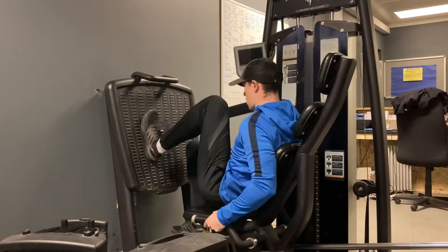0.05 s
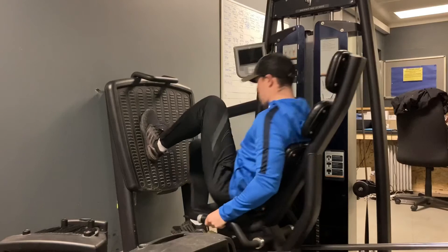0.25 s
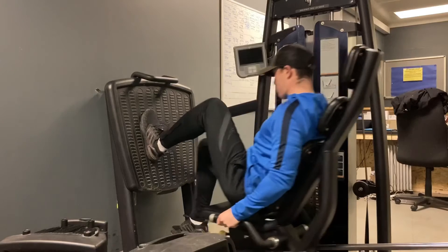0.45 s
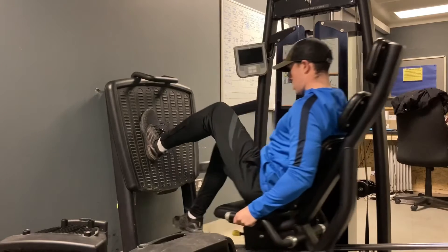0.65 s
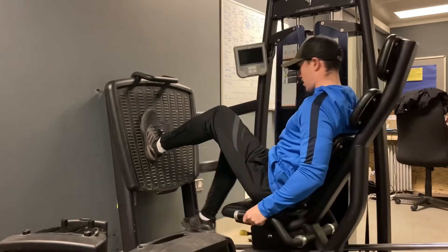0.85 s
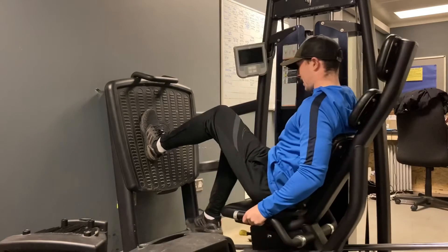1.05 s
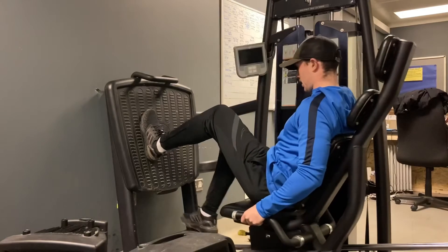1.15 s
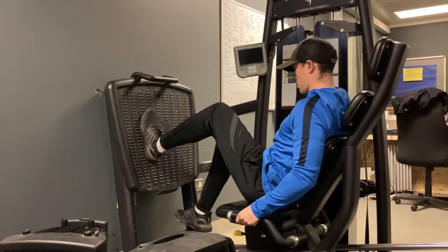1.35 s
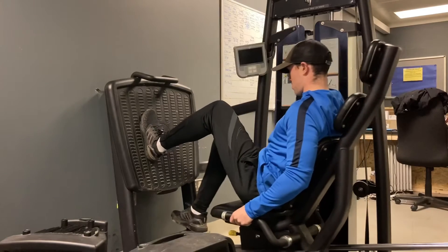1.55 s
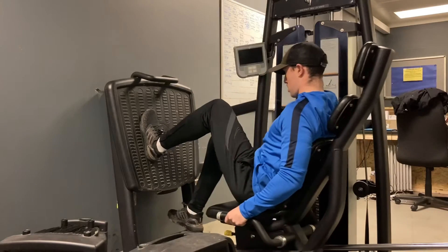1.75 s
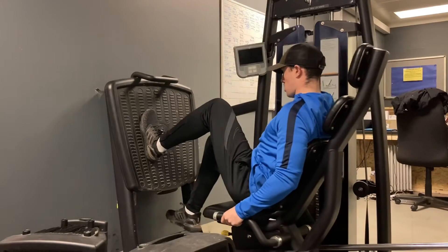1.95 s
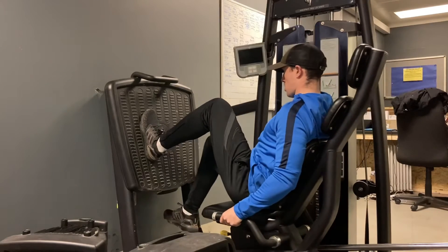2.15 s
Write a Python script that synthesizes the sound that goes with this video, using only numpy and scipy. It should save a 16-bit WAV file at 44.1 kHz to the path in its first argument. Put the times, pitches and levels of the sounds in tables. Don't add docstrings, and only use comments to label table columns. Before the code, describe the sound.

A leg press carriage moves in a quiet, ventilated room. A latch clacks at 0.1 s, a steel pin clanks and rings at 0.2, then padded jolts judder until about 0.45, strongest near 0.25 to 0.3. Rollers rumble and the seat rattles; belt scrape, a tiny squeak and nylon swish come around 0.45 to 0.75. From 1 s, only soft rolling, faint cloth and tiny ticks near 1.8 remain.

```python
import sys
import numpy as np
from scipy import signal
from scipy.fft import rfft, irfft, next_fast_len
from scipy.io import wavfile
from scipy.ndimage import uniform_filter1d, map_coordinates

SR = 44100
rng = np.random.default_rng(int(sys.argv[2]) if len(sys.argv) > 2 else 0)


def master(y):
    cut = np.clip(np.atleast_2d(y).T, -1, 1)
    pcm = np.round(cut * 32767)
    wavfile.write(sys.argv[1], SR, pcm.astype(np.int16))


def volts_from_decibels(level):
    exponent = np.asarray(level, float) / 20
    return 10 ** exponent


N = 97020

# (frequency [Hz], level [dB per Hz])
AIR_COLOUR = [(30, -5), (150, -6.5), (900, -9), (1500, -9.5), (3000, -17.5), (5000, -22.5), (8300, -29),
              (12000, -50.5), (14000, -58)]
# (frequency [Hz], width [Hz], level [dB])
DUCT_PEAKS = [(530, 60, -4), (850, 50, -2), (925, 50, 0)]
# (frequency [Hz], time to fall 60 dB [s])
ROOM_DECAY = [(150, 1), (1000, 1), (4000, 0.28), (12000, 0.053)]
# (time [s], level [dB])
SWISH_LEVEL = [(0.0, -79), (0.14, -77), (0.27, -65), (0.34, -56), (0.46, -52.5), (0.58, -53.5),
               (0.66, -54.5), (0.82, -65.5), (0.91, -83), (1.21, -74), (1.41, -64), (1.53, -65),
               (1.85, -68.5), (1.91, -75), (2.05, -83), (2.2, -84)]
# (frequency [Hz], level [dB per Hz])
CLOTH_COLOUR = [(1500, -19), (3000, -5), (5500, -6.5), (7500, -5.5), (9500, 1.5), (11500, -3.5),
                (14000, -6.5), (16500, -7)]
# (time [s], peak level [dB])
FITTING_TICKS = [(0.0922, -44.5), (.1875, -44), (0.196, -38), (.208, -47.5), (1.769, -53.5), (1.832, -58),
                 (1.8502, -60), (1.942, -51)]
# (frequency [Hz], level [dB per Hz])
TICK_COLOUR = [(3000, 4), (5000, 15), (7000, 1.5), (9000, 21.5), (11500, 13), (14000, 16.5), (15500, 9),
               (16500, -1)]
# (time [s], level [dB], rise [s], time to fall 60 dB [s])
BELT_RUBS = [(.44, -42, .03, 0.23), (0.524, -33, 0.02, 0.33), (.595, -36.5, 0.0085, 0.13),
             (.655, -36, 0.036, 0.3), (.69, -34, 0.019, 0.29), (.76, -56.5, 0.011, 0.29)]
# (frequency [Hz], level [dB per Hz])
BELT_COLOUR = [(300, -16), (600, -1.5), (1300, 1), (2300, 0.5), (3500, -12.5), (7000, -19), (10000, -93)]
# (frequency [Hz], level [dB], time to fall 60 dB [s])
PULLEY_TONES = [(1270, 3, .16), (1480, -4, .1)]
# (time [s], level [dB], rise [s], time to fall 60 dB [s])
PIN_CHATTER = [(.196, -37, .01, .25), (.297, -42, .004, .08), (.318, -39, .008, .12),
               (.379, -41, .008, .16), (.47, -50, .02, .5)]
# (frequency [Hz], width [Hz], level [dB])
BORE_PEAKS = [(3560, 130, 0)]
# (frequency [Hz], level [dB], time to fall 60 dB [s])
LATCH_TONES = [(188, 3, .2), (834, 0, .12), (860, -4, .1), (1130, -3, .08), (1470, 1, .08), (2000, -3, .07),
               (2336, -4, .07), (2595, -6, .07), (2923, -8, .08), (3800, 5, .045)]
# (frequency [Hz], level [dB per Hz])
SNAP_COLOUR = [(200, -12), (400, -10), (900, -23), (2000, 4.5), (3800, -3.5), (6000, -3.5), (16000, -29)]
# (time [s], level [dB])
PIN_BLOWS = [(.196, -15)]
# (frequency [Hz], level [dB], time to fall 60 dB [s])
PIN_TONES = [(3079, -18, .08), (3545, -14, .08), (3574, -12, .2), (3580, 0, .13), (3625, -14, .08)]
# (frequency [Hz], level [dB], time to fall 60 dB [s])
PLATE_TONES = [(618, -1, .1), (737, -1, .16), (877, -6, .14), (1031, -5, .14), (1415, 2, .07),
               (1600, -9, .08), (1685, -8, .12), (1890, -8, .2), (1965, -10, .2), (2156, -8, .06),
               (2270, -12, .12), (3074, -12, .1), (3950, -14, .08), (4450, -14, .04)]
# (time [s], level [dB], rise [s], time to fall 60 dB [s])
METAL_CLANKS = [
    (0.183, -17.5, 0.03, 0.3),
    (.205, -29, 0.028, 0.33),
]
# (frequency [Hz], level [dB per Hz])
CLATTER_COLOUR = [(300, -12), (700, -2), (1500, -2), (2500, -1.5), (4500, -5.5), (7000, -16.5), (10000, -7),
                  (16000, -71)]
# (time [s], peak level [dB], pitch [Hz], time to fall 60 dB [s])
JOLTS = [(0.203, -15.5, 312, 0.03), (0.21, -20.5, 614, .04), (0.223, -15, 418, 0.052),
         (0.243, -3, 455.5, 0.0204), (0.256, -17.5, 354.6, 0.038), (.278, -18, 454, 0.019),
         (0.3, -7, 303, 0.034), (0.313, -9, 292.5, 0.051), (0.341, -11.5, 327, 0.026),
         (0.373, -10, 338.8, 0.048), (0.417, -14.5, 354, 0.032), (.435, -14, 320, .03),
         (0.545, -21, 217, 0.065), (0.637, -41, 182, 0.025), (0.743, -29, 222, 0.048)]
# (frequency [Hz], width [Hz], level [dB])
SEAT_PEAKS = [(231.5, 48, -5.5), (330.5, 24.4, 0), (352, 22.7, 0.5), (433, 47, -1), (536.8, 53, -2),
              (770, 185, -7), (863, 40, -0.5), (990.5, 40, -2.5), (1400, 600, -21), (1936, 150, -12),
              (2320, 600, -18)]
# (frequency [Hz], level [dB per Hz])
RATTLE_COLOUR = [(100, -69), (250, 3.5), (700, -1), (2000, -17), (5000, -16.5), (9000, -47), (11000, -90)]
# (time [s], level [dB])
ROLL_SPEED = [(0.0, -39.5), (0.08, -49), (0.1, -35.5), (0.18, -36.5), (0.24, -29), (0.28, -23.5),
              (0.31, -23), (0.35, -23.5), (0.44, -25.5), (0.46, -26), (0.57, -28), (0.63, -29.5),
              (0.78, -32.5), (1.05, -45), (1.59, -44), (1.88, -47.5), (1.96, -56), (2.2, -62)]
# (frequency [Hz], level [dB per Hz])
RUMBLE_COLOUR = [(25, 8), (45, 0.5), (100, -6), (300, -5.5), (600, 4), (2000, 0), (7000, -34), (10000, -90)]
# (frequency [Hz], width [Hz], level [dB])
FRAME_PEAKS = [(48, 20, -10), (72, 25, -5), (150, 24, -2), (192, 22, 0), (235, 30, -8)]
# (frequency [Hz], width [Hz], level [dB])
ROLLER_PEAKS = [(156.5, 10, -3), (199.3, 7.2, -2.5), (230, 14, -2)]
# (frequency [Hz], likeness [0 to 1])
LIKENESS = [(60, .97), (290, .82), (640, .5), (1400, .4), (3500, .3), (5600, .25), (6600, .96),
            (16000, .97)]
# (frequency [Hz], left lag [radians])
PORT_LAG = [(0, 0), (1500, 1.2), (6500, 12.4), (7500, 12.75), (8500, 15.5), (9600, 15.9), (10900, 18.6),
            (12000, 19.1), (13100, 21.8), (14400, 22.2), (15200, 25), (16000, 25.2)]
# (frequency [Hz], left over right [dB])
BALANCE = [(60, -2), (200, -1), (500, 0), (1500, 1), (6000, 1), (10000, 0)]


def unit(x):
    return x / np.sqrt(np.mean(x ** 2) + 1e-20)


def along(points, hz):
    f, v = np.transpose(points)
    return np.interp(np.log(hz + 1), np.log(f + 1), v)


def curve(rows):
    return np.interp(np.arange(N) / SR, *np.transpose(rows))


def wobble(rate):
    knots = rng.standard_normal(int(N * rate / SR) + 4)
    return map_coordinates(knots, [np.arange(N) * rate / SR])


def filtered(x, response):
    m = next_fast_len(N + SR // 2)
    return irfft(rfft(x, m) * response(np.fft.rfftfreq(m, 1 / SR)), m)[..., :N]


def spread(pair, spectrum):
    def shares(hz):
        turn = np.arccos(np.clip(along(LIKENESS, hz), -1, 1)) / 2
        return volts_from_decibels(along(spectrum, hz)) * [np.cos(turn), np.sin(turn)]

    mid, side = filtered(pair, shares)
    return np.array([mid + side, mid - side])


def rush(spectrum, patchy_db):
    z = signal.stft(rng.standard_normal((2, N)), nperseg=512)[2]
    field = uniform_filter1d(rng.standard_normal(z.shape[1:]), 6, 0)
    field = uniform_filter1d(field, 10, 1)
    noise = signal.istft(z * volts_from_decibels(patchy_db * unit(field)), nperseg=512)[1][:, :N]
    return unit(spread(noise, spectrum))


def after(s, rise_s, t60):
    t = np.maximum(np.arange(N) / SR - s, 0)
    return (1 - np.exp(-t / rise_s)) * volts_from_decibels(-60 * t / t60)


def bursts(rows):
    return sum(volts_from_decibels(db) * after(s, rise_s, t60) for s, db, rise_s, t60 in rows)


def ring(s, db, modes, rise_s):
    start, out = int(s * SR) + 1, np.zeros(N + SR)
    t = (start + np.arange(int(0.6 * SR))) / SR - s
    tones = sum(volts_from_decibels(db + level - 60 * t / t60) * np.sin(2 * np.pi * hz * t) for hz, level, t60 in modes)
    out[start:start + len(t)] = (1 - np.exp(-t / rise_s)) * tones
    return out[:N]


def body(peaks, leak):
    def response(f):
        total = leak
        for k, (centre, width, db) in enumerate(peaks):
            band = 1j * f * width / (centre * centre - f * f + 1j * f * width)
            total = total + (-1) ** k * volts_from_decibels(db) * band
        return total

    return response


def plate(modes):
    return body([(hz, 60, db) for hz, db, t60 in modes], leak=0.3)


def ventilation():
    return volts_from_decibels(-53) * filtered(rush(AIR_COLOUR, patchy_db=1.4), lambda hz: 1 + abs(body(DUCT_PEAKS, leak=0)(hz)))


def room(x):
    hz, t, z = signal.stft(rng.standard_normal((2, SR // 2)), SR, nperseg=256)
    fade = volts_from_decibels(-60 * t / along(ROOM_DECAY, hz)[:, None])
    tail = signal.istft(z * fade, SR, nperseg=256)[1]
    delayed = np.pad(x, (300, 0))[None]
    wet = signal.fftconvolve(delayed, tail / np.linalg.norm(tail[0]), axes=1)[:, :N]
    return spread(wet, [(100, 0.0059)])


def jacket():
    level_db = curve(SWISH_LEVEL) + 3 + 1.5 * wobble(400) + 1.2 * wobble(20)
    return volts_from_decibels(level_db) * rush(CLOTH_COLOUR, patchy_db=1.5)


def ticks():
    shape = 0
    for s, db in FITTING_TICKS:
        click, answer = after(s, 0.00052, 0.067), volts_from_decibels(-9) * after(s, 0.0013, 0.44)
        shape = shape + volts_from_decibels(db + 4.5) * (click + answer)
    return shape * rush(TICK_COLOUR, patchy_db=0.6)


def belt():
    scrape = unit(filtered(rush(BELT_COLOUR, patchy_db=1.8), plate(PLATE_TONES)))
    return bursts(BELT_RUBS) * volts_from_decibels(0.89 * wobble(119.4)) * scrape


def pulley():
    return ring(0.535, -31, PULLEY_TONES, rise_s=0.011)


def pin_buzz():
    bore = body(BORE_PEAKS, leak=0)
    whine = unit(filtered(rng.standard_normal(N), lambda hz: bore(hz) ** 2))
    return bursts(PIN_CHATTER) * volts_from_decibels(0.81 * wobble(42.3)) * whine


def latch_rattle():
    snap_s = 0.089
    shape = after(snap_s, 0.008, 0.06) + volts_from_decibels(-13.5) * after(snap_s, 0.012, 0.5)
    return volts_from_decibels(-23.5) * shape * unit(filtered(rush(SNAP_COLOUR, patchy_db=2.0), plate(LATCH_TONES)))


def latch_ring():
    return ring(0.09298, -35, LATCH_TONES, rise_s=0.0062)


def pin_and_plate():
    pin = sum(ring(s, db, PIN_TONES, rise_s=0.011) for s, db in PIN_BLOWS)
    return pin + ring(0.207, -20, PLATE_TONES, rise_s=0.0096)


def clatter():
    parts = unit(filtered(rush(CLATTER_COLOUR, patchy_db=-0.5), plate(PLATE_TONES)))
    return bursts(METAL_CLANKS) * volts_from_decibels(2.8 * wobble(160.0)) * parts


def jolted_seat():
    shape = bursts([(s, db - 11, 0.003, 0.089) for s, db, hz, t60 in JOLTS])
    return shape * unit(filtered(rush(RATTLE_COLOUR, patchy_db=3.5), body(SEAT_PEAKS, leak=0.11)))


def judder():
    out = 0
    for s, db, hz, t60 in JOLTS:
        modes = [(hz, 0, t60), (hz * 0.7, -3, t60 * 0.99), (hz * 1.558, -10, t60 * 0.91)]
        out = out + ring(s, db + 10, modes, rise_s=0.012)
    return out


def carriage():
    speed_db = curve(ROLL_SPEED)
    top_db = speed_db.max()
    rumble = volts_from_decibels(0.33 * wobble(25.1)) * rush(RUMBLE_COLOUR, patchy_db=1.5)
    rumble = unit(filtered(rumble, body(FRAME_PEAKS, leak=0.027)))
    rattle = volts_from_decibels(0.39 * wobble(92.0)) * rush(RATTLE_COLOUR, patchy_db=1.0)
    rattle = unit(filtered(rattle, body(SEAT_PEAKS, leak=0.12)))
    rollers = body(ROLLER_PEAKS, leak=0)
    whirr = unit(filtered(rush([(100, 0)], patchy_db=-1.0), lambda hz: rollers(hz) ** 2))
    rattle_db = top_db - 1 + 1.5 * (speed_db - top_db)
    return volts_from_decibels(speed_db - 7.5) * (rumble + volts_from_decibels(-4) * whirr) + volts_from_decibels(rattle_db) * rattle


def scene():
    struck = judder() + pin_and_plate() + latch_ring() + pulley() + pin_buzz()
    background = ventilation() + jacket() + ticks()
    machine = carriage() + clatter() + latch_rattle() + jolted_seat() + belt()
    return struck + volts_from_decibels(-12) * room(struck) + machine + background


def top_cut(x):
    return signal.sosfilt(signal.butter(12, 16630, fs=SR, output="sos"), x)


def record(dry):
    def ports(hz):
        lag = np.exp(np.outer([-0.5j, 0.5j], np.interp(hz, *np.transpose(PORT_LAG))))
        band = (hz < 16000) / (1 + (38 / (hz + 1)) ** 6)
        return lag * band * volts_from_decibels(np.outer([0.5, -0.5], along(BALANCE, hz)))

    return top_cut(filtered(dry, ports))


dry = scene()
out = record(dry)
master(out)
```